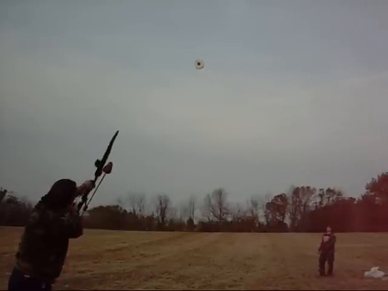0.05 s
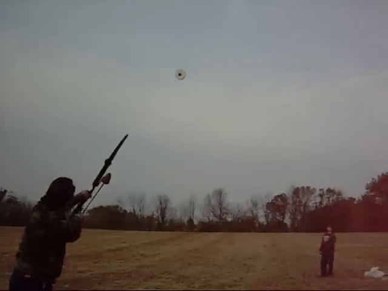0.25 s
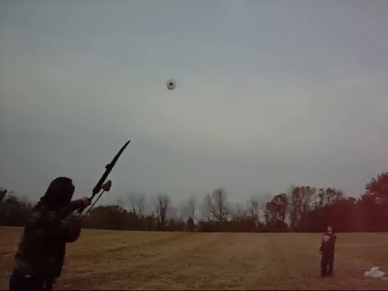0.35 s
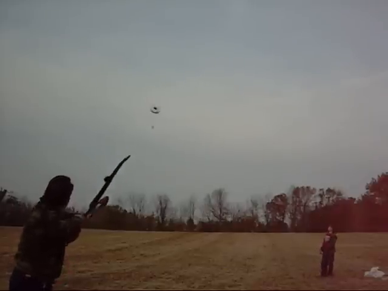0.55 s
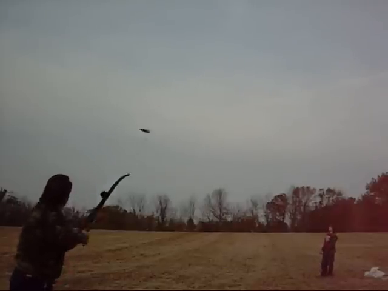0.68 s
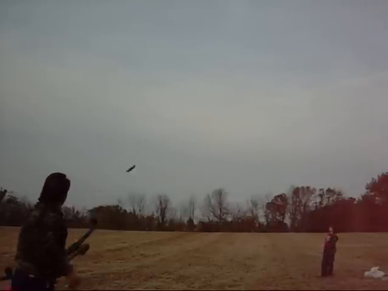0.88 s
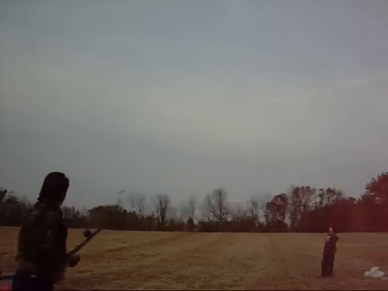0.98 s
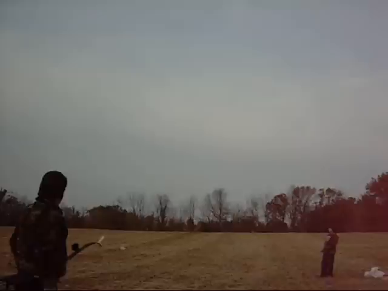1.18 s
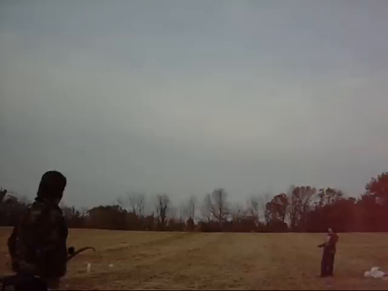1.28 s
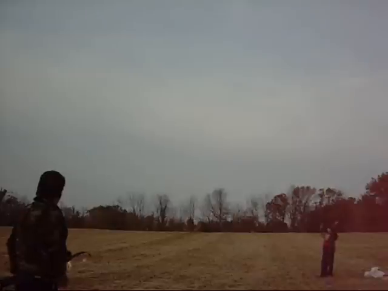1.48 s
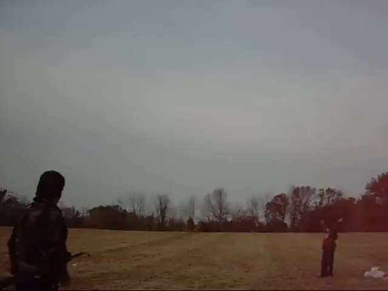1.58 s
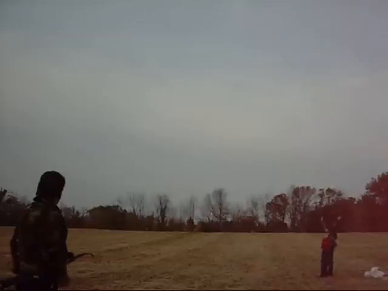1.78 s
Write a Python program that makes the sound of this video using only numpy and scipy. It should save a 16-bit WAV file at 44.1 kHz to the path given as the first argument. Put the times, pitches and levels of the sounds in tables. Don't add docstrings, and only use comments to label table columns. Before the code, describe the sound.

A bowstring scrapes and slaps loudly, the arrow hisses away, then cracks sharply on a thrown disc. Low wind and distant road roar surround it; later, gusts thump a cheap, clipping microphone as dry stubble rustles.

```python
import sys
import numpy as np
from scipy import signal
from scipy.fft import rfft, irfft
from scipy.io import wavfile
from scipy.ndimage import uniform_filter1d

SR = 44100
rng = np.random.default_rng(int(sys.argv[2]) if len(sys.argv) > 2 else 0)


def transcribe(signal):
    frames = np.atleast_2d(signal).T
    limited = np.clip(frames, -1, 1)
    pcm = np.round(limited * 32767).astype(np.int16)
    wavfile.write(sys.argv[1], SR, pcm)


def volts_from_db(level):
    exponent = np.asarray(level, float) / 20
    return 10 ** exponent


N = 81585
T = np.arange(N) / SR


def unit(x):
    return x / np.sqrt(np.mean(x ** 2))


def colour(spectrum):
    hz, db = np.array(spectrum).T
    bins_hz = np.maximum(np.arange(N // 2 + 1) * SR / N, 1)
    gain = volts_from_db(np.interp(np.log(bins_hz), np.log(hz), db))
    return unit(irfft(rfft(rng.standard_normal(N)) * gain, N))


def walk(rate_hz):
    hold = int(SR / rate_hz)
    steps = rng.standard_normal(N)[(T * rate_hz).astype(int)]
    return unit(uniform_filter1d(uniform_filter1d(steps, hold), hold))


def ring(push, hz, t60):
    decay = np.log(1000) / (max(t60, 0.002) * SR)
    pole = np.exp(2j * np.pi * hz / SR - decay)
    return signal.lfilter([1], [1, -pole], push).imag


def road():
    # (frequency [Hz], density [dB per Hz])
    roar = [(180, -58), (300, -22), (436, -18.5), (634, -7.5), (873, -1), (2050, -10), (3950, -24.5),
            (7300, -15), (9490, -33), (16100, -120)]
    swell_db = 0.91 * walk(0.64) + 0.5 * walk(11.35)
    return colour(roar) * volts_from_db(-34 + swell_db)


def wind():
    # (time [s], level [dB], brightness corner [Hz])
    gust_path = [(0, -43, 120), (0.299, -38, 120), (.55, -44, 70), (.8, -50, 50), (.95, -65, 60),
                 (1.10, -36, 49.7), (1.25, -46, 79.6), (1.36, -38.5, 118), (1.455, -20, 122),
                 (1.50, -27.5, 121), (1.575, -21, 126), (1.63, -31, 110), (1.655, -45, 90), (1.68, -29, 90),
                 (1.72, -41, 80), (1.80, -34, 70), (1.85, -37, 70)]
    # (frequency [Hz], density [dB per Hz])
    breeze = [(13, -16), (22, -1), (59, -2.5), (140, -13.5), (205, -26.5), (226, -27), (300, -29),
              (390, -59), (660, -120)]
    at, level_db, brightness_hz = np.array(gust_path).T
    corner_hz = np.interp(T, at, np.clip(brightness_hz, 20, 300))
    rumble = 0
    for hz in 40 * 2 ** np.arange(0, 4.1, 0.5):
        once = ring(rng.standard_normal(N), hz, 5 / hz)
        band = unit(ring(once, hz, 5 / hz))
        rumble = rumble + band / (1 + (hz / corner_hz) ** 1.73)
    buffet_db = 3 * walk(40.5)
    gusts = 0.5 * rumble * volts_from_db(np.interp(T, at, level_db) + buffet_db)
    return gusts + colour(breeze) * volts_from_db(-38.5 + 4.5 * walk(8.03))


def stubble():
    # (time [s], rise [s], fall [s], level [dB])
    rustles = [
        (.045, 0.012, .005, -42),
        (0.581, 0.018, 0.011, -32.5),
        (1.402, 0.0067, .008, -54),
        (1.5041, 0.00093, 0.0026, -30),
        (1.51, 0.0029, 0.0056, -22.5),
        (1.535, 0.0071, 0.0035, -34),
        (1.542, 0.0026, .006, -35.5),
    ]
    # (frequency [Hz], density [dB per Hz])
    stalks = [(1000, -27), (2000, -12), (3000, 1.5), (4200, 2.5), (5200, -5), (6500, -23), (7900, -13)]
    envelope = 0
    for at, rise, fall, db in rustles:
        distance = np.where(T < at, (at - T) / rise, (T - at) / fall)
        envelope = envelope + volts_from_db(db) * np.exp(-distance ** 2)
    grain = volts_from_db(1.8 * walk(900))
    return envelope * unit(colour(stalks) * grain)


def arrow():
    # (time [s], level [dB])
    flight = [
        (.2458, -58),
        (0.2462, -22),
        (0.257, -16),
        (0.26, -10),
        (.2680, -20),
        (.3000, -22),
        (.3800, -28),
        (.5300, -34.5),
        (0.591, -38),
    ]
    # (frequency [Hz], density [dB per Hz])
    feathers = [(180, -3), (300, -11), (383, -8.5), (678, -10), (964, -7), (1180, -5.5), (3410, -3),
                (7700, -14.5), (10000, -37), (16900, -120)]
    at, level_db = np.array(flight).T
    flutter = volts_from_db(1 * walk(714))
    hiss = unit(colour(feathers) * flutter)
    return hiss * volts_from_db(np.interp(T, at, level_db, left=-99, right=-99))


def disc():
    # (frequency [Hz], level [dB], t60 [s])
    disc_modes = [(340, -9, 0.056), (386, -22, 0.062), (680, -9, 0.044), (950, -12.5, 0.038),
                  (1680, -13, 0.062), (2150, -10.5, 0.043), (2400, -2.5, 0.023), (2633, -0.5, 0.024),
                  (3250, -13, 0.023), (3726, -5, 0.047), (4290, -5.5, 0.042), (5330, -6, 0.031),
                  (5560, -13, 0.034), (6670, -27, 0.023)]
    # (frequency [Hz], density [dB per Hz])
    splinters = [(200, -40), (600, -20), (1300, -6), (2400, 0), (4300, -12), (5700, -11), (7900, -6)]
    strike_s, damped_s, rim_hz = 0.5331, 0.0067, 1500
    crack_db, crack_rise_s, crack_t60_s = -15, 0.00034, 0.031
    blow = np.zeros(N)
    blow[int(strike_s * SR)] = volts_from_db(-2.5)
    age = np.maximum(T - strike_s, 0)
    choke = 1 / (1 + (age / damped_s) ** 5)
    ringing = 0
    for hz, db, t60 in disc_modes:
        damping = choke if hz > rim_hz else 1
        ringing = ringing + volts_from_db(db) * ring(blow, hz, t60) * damping
    crack_envelope = volts_from_db(crack_db - 60 * age / crack_t60_s) * np.minimum(age / crack_rise_s, 1)
    return ringing + crack_envelope * colour(splinters)


def bow():
    # (time [s], level [dB])
    knocks = [(.2470, -7.5), (.2497, -12), (.2522, -10.5), (.2575, -9.5), (0.2584, -12), (0.2592, -7),
              (.2615, 3.5), (.2630, 0), (.2642, -3), (.2668, -15), (.2708, -10.5), (.2762, -10),
              (.2803, -14), (.2885, -23)]
    # (frequency [Hz], level [dB], t60 [s])
    body_modes = [(369.5, -17.5, 0.038), (542, -18.5, 0.018), (890, -9.5, .012), (1670, -6, 0.0094),
                  (2200, -1, 0.0039), (3054, 1, 0.013), (3910, -1, .007), (4950, -4.5, 0.013),
                  (6100, -8.5, .005), (7730, -11, 0.0044)]
    bow_db, scatter_db = -3, 1
    at, knock_db = np.array(knocks).T
    samples = (at * SR).astype(int)
    body = 0
    for hz, mode_db, t60 in body_modes:
        strength = volts_from_db(knock_db + scatter_db * rng.standard_normal(len(knocks)))
        sign = np.sign(rng.standard_normal(len(knocks)))
        push = np.zeros(N)
        push[samples] = strength * sign
        body = body + volts_from_db(mode_db + bow_db) * ring(push, hz, t60)
    return body


def scene():
    no_bass = signal.butter(3, 277, "high", fs=SR, output="sos")
    hits = signal.sosfilt(no_bass, arrow() + disc() + bow())
    return (road() + wind() + stubble() + hits)[None]


def roll_off(x):
    return signal.sosfilt(signal.butter(12, 15700, fs=SR, output="sos"), x)


def record(dry):
    clip, converter_db = 0.92, -64
    steep = signal.butter(14, 7080, fs=SR, output="sos")
    x = signal.sosfilt(steep, dry)
    x = signal.resample_poly(x, 160, 441, axis=1, window=("kaiser", 2.0))
    x = np.clip(x + volts_from_db(converter_db) * rng.standard_normal(x.shape), -clip, clip)
    held = x[:, np.arange(N) * 160 // 441]
    top = signal.ellip(8, 0.1, 30, 15450, fs=SR, output="sos")
    return roll_off(signal.sosfiltfilt(top, held))


dry = scene()
out = record(dry)
transcribe(out)
```